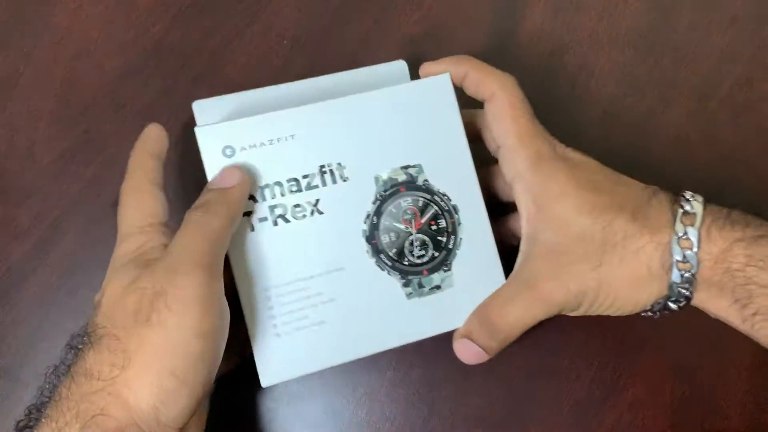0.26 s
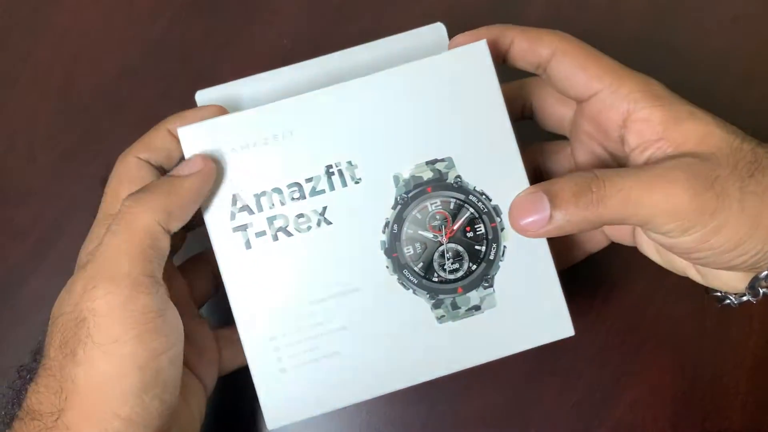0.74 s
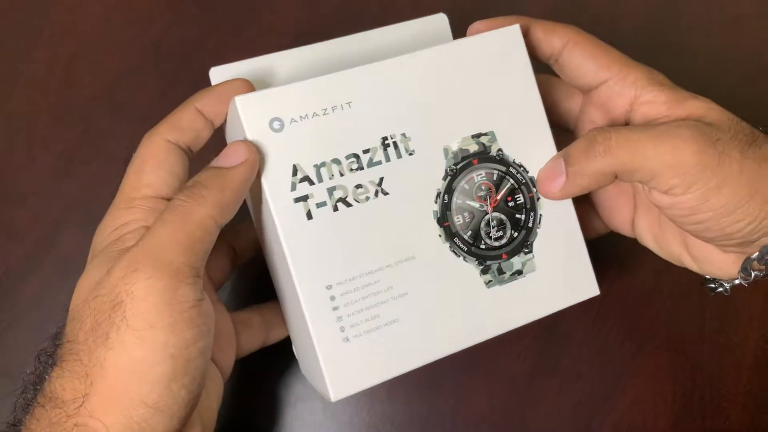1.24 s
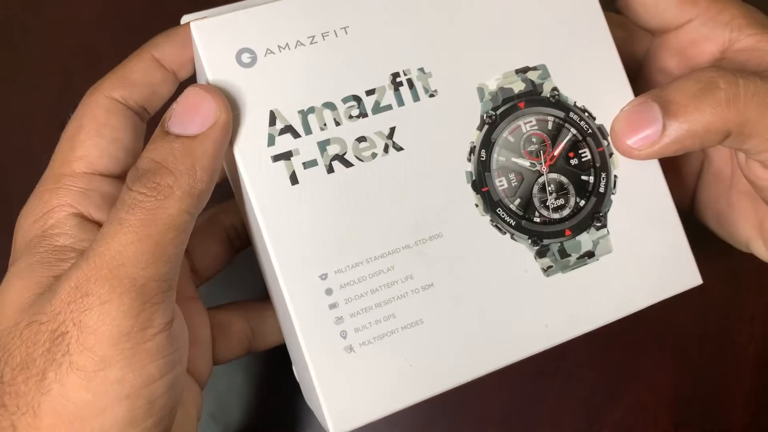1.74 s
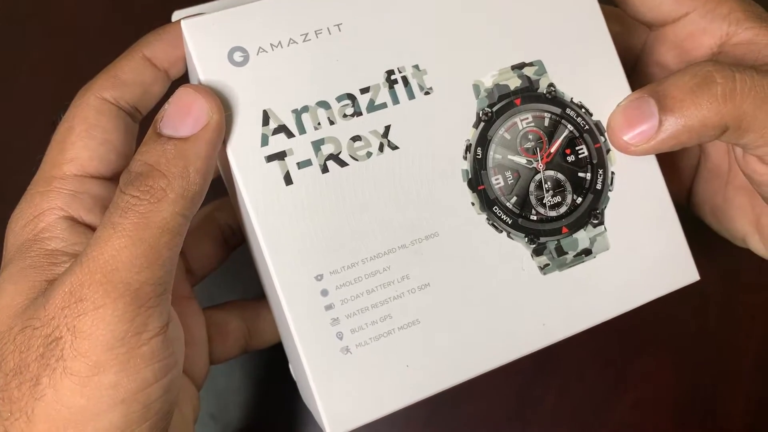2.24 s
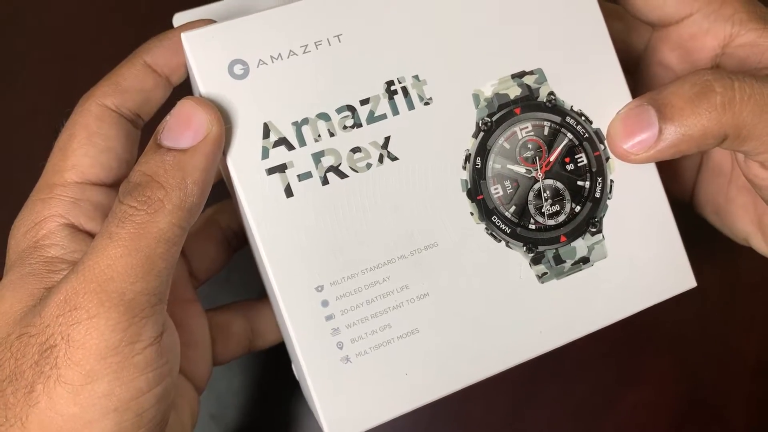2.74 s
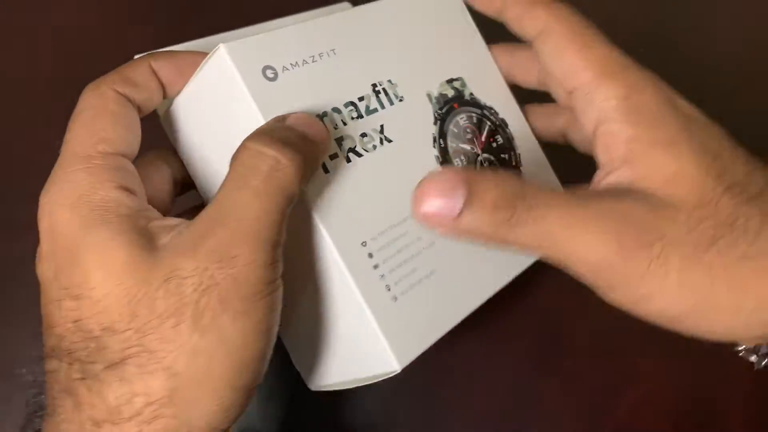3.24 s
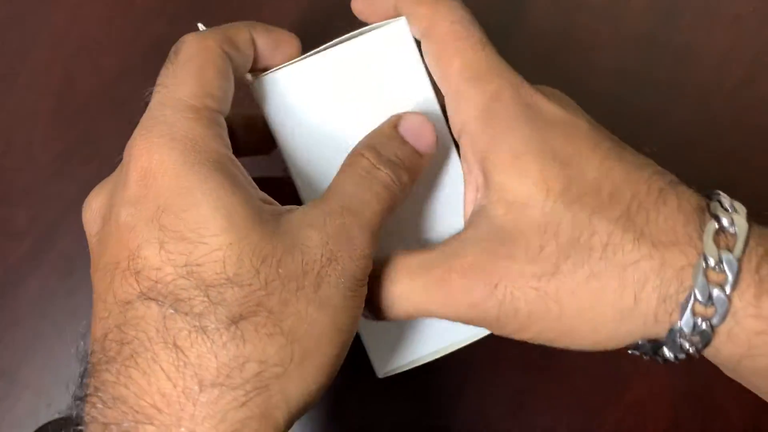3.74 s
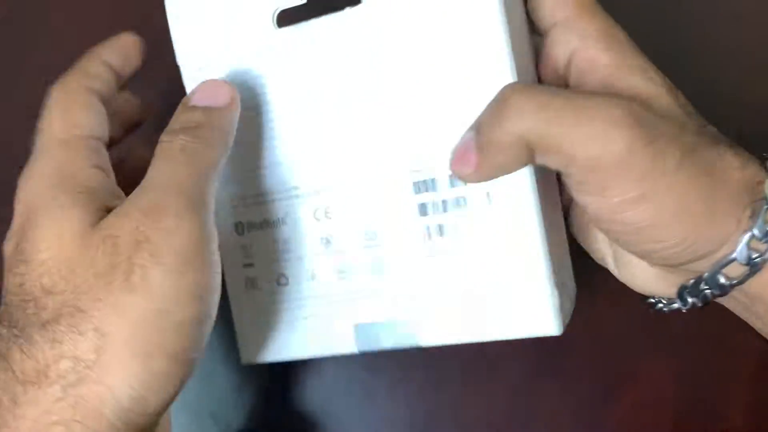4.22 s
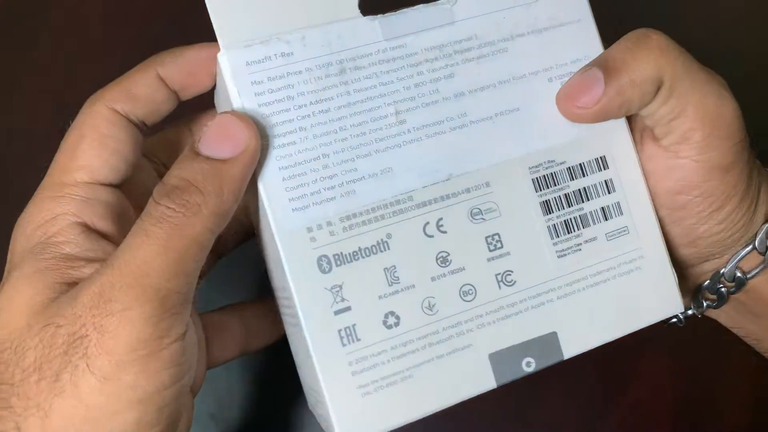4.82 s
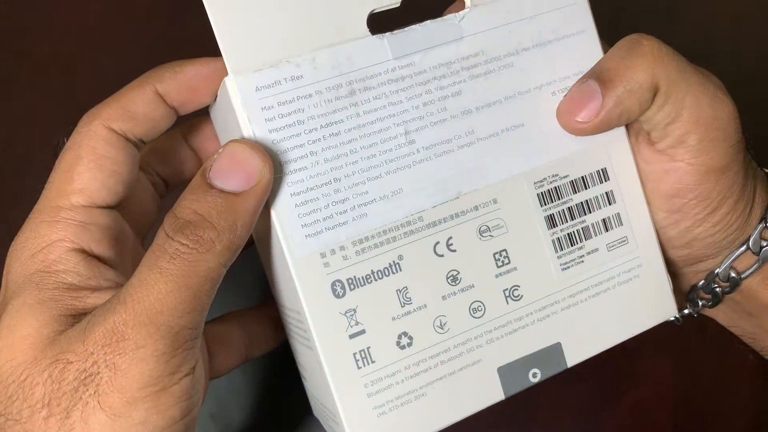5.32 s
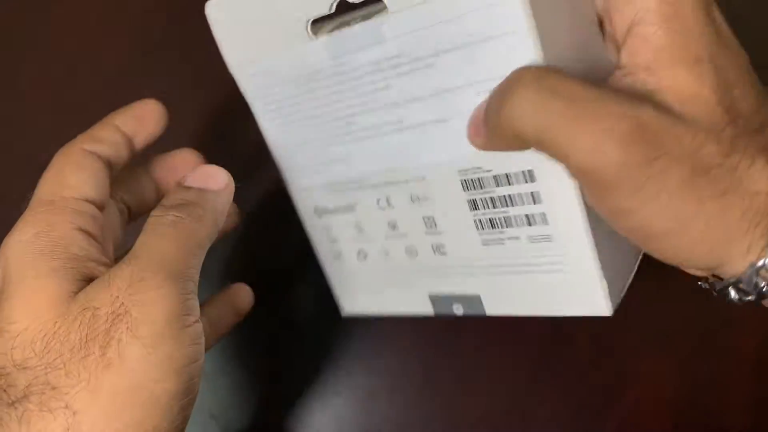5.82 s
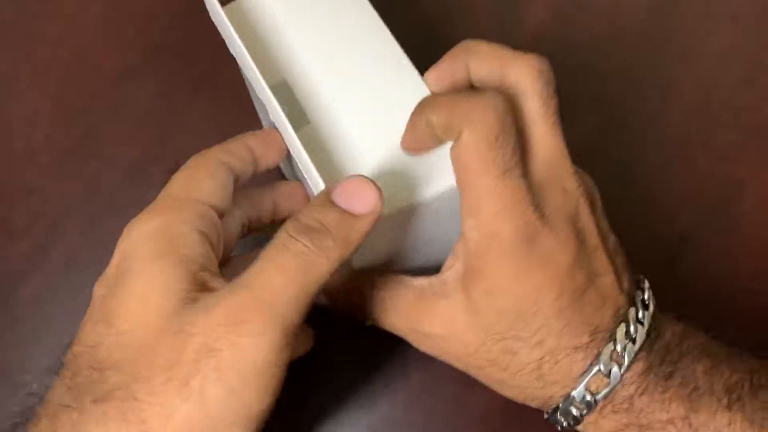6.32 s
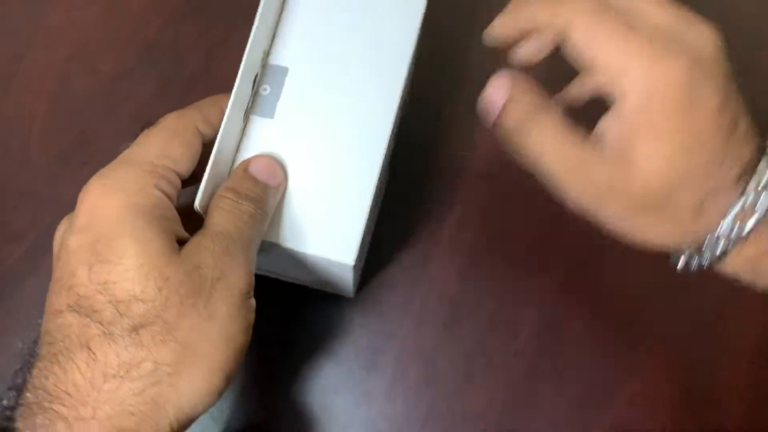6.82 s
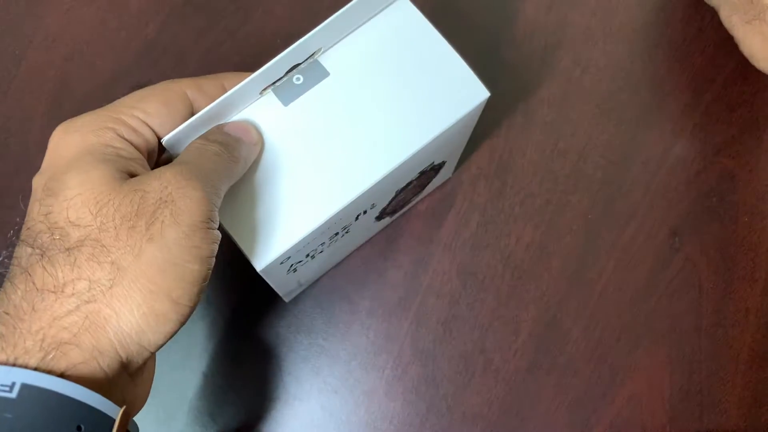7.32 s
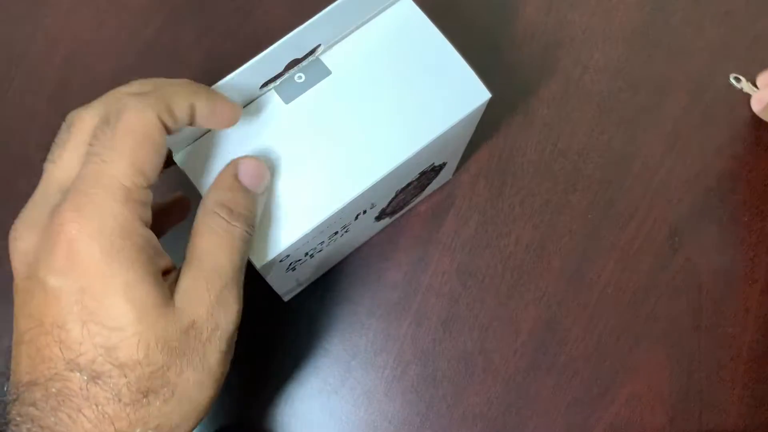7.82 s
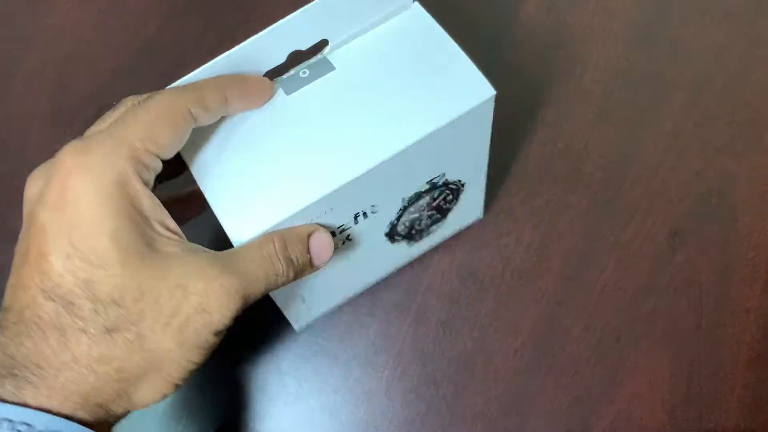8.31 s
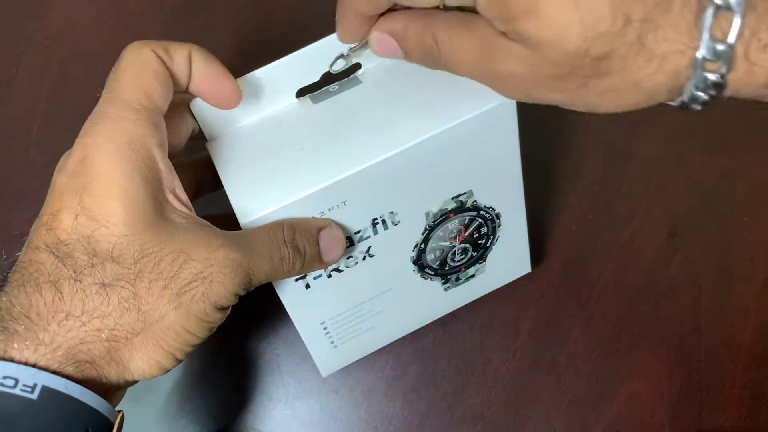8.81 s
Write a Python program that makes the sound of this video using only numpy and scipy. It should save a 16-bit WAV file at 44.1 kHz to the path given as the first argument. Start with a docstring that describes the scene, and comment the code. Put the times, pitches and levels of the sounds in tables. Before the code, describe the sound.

Fingers softly rub and tick on a small cardboard box over a steady fan hum, then it knocks down hard on wood and something scrapes.

```python
"""Hands turn a small cardboard box over a wooden table in a room with a fan hum; a phone listens from above.
Fingers rub the card: noise grains under swelling pressure; fingers and bouncing box tick: short noise bursts.
The box lands in three blows, the last two close together: decaying modes of box and table, and a noise tail.
Two scrapes over the table, as a small metal pin is taken up, add singing bands and ringing snags.
The fan is shaped noise; the left and right channels carry it all slightly unlike."""
import sys
import numpy as np
from scipy import signal
from scipy.fft import rfft, irfft, next_fast_len
from scipy.io import wavfile
from scipy.ndimage import uniform_filter1d

SR = 44100
rng = np.random.default_rng(int(sys.argv[2]) if len(sys.argv) > 2 else 0)


def materialize(psi):
    """Save the field psi as 16-bit PCM at rate SR to the path in sys.argv[1].

    A 1-D psi becomes a single channel; in a 2-D psi each row is a channel.
    """
    bounded = np.clip(np.atleast_2d(psi).T, -1, 1)
    quanta = np.round(bounded * 32767).astype(np.int16)
    wavfile.write(sys.argv[1], SR, quanta)


N = 399546


def amp(db):
    """Gain of a level in dB."""
    return 10 ** (np.asarray(db) / 20)


def evened(x):
    """Scales to rms 1."""
    return x / np.sqrt(np.mean(x ** 2) + 1e-20)


def noise(*shape):
    """White noise of unit variance."""
    return rng.standard_normal(shape)


def read(points, hz):
    """Reads a spectrum table on a log-frequency axis."""
    f, value = np.transpose(points)
    return np.interp(np.log(hz + 1), np.log(f + 1), value)


def add(mix, s, sound):
    """Adds a sound to the mix at a time in seconds."""
    part = mix[:, round(s * SR):][:, :sound.shape[1]]
    part += sound[:, :part.shape[1]]


def colour(x, gain):
    """Filters by a function of frequency."""
    size = next_fast_len(x.shape[-1] + 4096)
    spectrum = rfft(x, size) * gain(np.fft.rfftfreq(size, 1 / SR))
    return irfft(spectrum, size)[..., :x.shape[-1]]


def hump(hz, centre_hz, width):
    """Magnitude of one resonance, top 1."""
    return 1 / np.sqrt(1 + (2 * (hz - centre_hz) / width) ** 2)


def slope(hz, lo_hz, hi_hz):
    """Band with fourth-order skirts."""
    return 1 / np.sqrt((1 + (lo_hz / (hz + 1)) ** 8) * (1 + (hz / hi_hz) ** 8))


# spectrum of the fan wash: f/Hz, relative level/dB
FAN_WASH = [(25, -17.5), (45, -11), (90, 7), (200, -4), (330, -0.5), (480, -3.5), (700, -21), (870, -3),
            (1150, -14), (2200, -25), (4200, -34.5), (5300, -46), (6000, -50), (9000, -72.5), (16000, -57)]
# table and room modes: f/Hz, level after a blow/dB, t60/s, relative level in the hum/dB
TABLE_MODES = [(51.1, -27, 1, -55), (82, -15.5, 0.16, -54), (110.6, -15.5, 1.1, -54),
               (112.4, -16.5, 1.27, -54), (165.9, -12.5, 0.56, -51.5), (263.6, -14.5, 0.33, -62.5),
               (312.6, -17.5, 0.7, -58), (390.6, -5.5, 0.54, -52.5), (446, -12, 0.32, -51),
               (456.5, -28, 0.64, -54), (517, -23.5, 0.66, -61.5), (673, -23, 0.28, -71.5),
               (887, -22, 0.19, -56.5)]
WASH_DB = -43.5  # before the air flow wavers


def hum():
    """Fan noise, which also keeps the modes of table and room sounding, wavers with the air flow."""
    wash = amp(WASH_DB) * evened(colour(noise(2, N), lambda f: amp(read(FAN_WASH, f))))

    def mode_gain(f):
        power = 0
        for hz, _, t60, db in TABLE_MODES:
            power = power + amp(2 * db) / (np.pi * 1.1 / t60) * hump(f, hz, 2.47 + 1.5 / t60) ** 2
        return np.sqrt(power * SR / 2)

    modes = colour(noise(2, N), mode_gain)
    air_flow = evened(colour(noise(N), lambda f: slope(f, .5, 23)))
    return amp(0.7 * air_flow) * (wash + modes)


def swell(rise, fall):
    """Power of one touch: up over rise seconds, down over fall seconds."""
    up = np.arange(0, 1, 1 / (rise * SR))
    down = np.arange(1, 0, -1 / (max(fall, .005) * SR))
    return abs(np.sin(np.pi / 2 * np.r_[up, down])) ** 4.9


# fingers sweep over the card, swelling and fading:
# start t/s, length t/s, scuff level/dB, skin hiss above scuff/dB
FINGER_STROKES = [(0, .15, -59, -10), (0, 1.28, -73.5, -7), (0.065, 0.24, -55, 3.5), (.18, 0.12, -55.5, -5),
                  (0.741, 0.13, -64.5, 5), (2.3, 3.9, -78.5, -6), (3.719, 0.16, -61.5, 12.5),
                  (3.952, 0.22, -66.5, -7), (5.678, 0.14, -67, -3), (5.763, 0.092, -70, 4),
                  (6.187, 0.11, -61.5, 2), (6.37, 0.21, -52, -3), (6.76, 0.49, -64, 4),
                  (8.755, 0.13, -65.5, -2.5)]
# fingers take hold at once and slip to rest: start t/s, length t/s, scuff level/dB, skin hiss above scuff/dB
FINGER_GRABS = [(0.268, 0.13, -64.5, -7), (0.345, 0.18, -69, 2), (0.51, 0.12, -72, -1),
                (0.712, 0.096, -68, 5), (3.1, 0.13, -66, -21), (3.17, 0.062, -61, 0),
                (3.315, 0.042, -64, -5), (3.423, 0.13, -74, 9.5), (3.629, 0.22, -69, 11),
                (4.265, 0.032, -59.5, 0), (4.625, 0.098, -65, -12), (6.288, 0.18, -51.5, 5),
                (6.504, 0.1, -53.5, -4), (6.548, 0.7, -65.5, -8), (8.587, 0.11, -62.5, -15),
                (8.658, 0.065, -63, -5)]
# two long scrapes over the table, each a run of points:
# t/s, scuff level/dB, skin hiss above scuff/dB, dull body level/dB
TABLE_SCRAPES = [
    [(7.325, -96, 0, -74), (7.35, -49.5, -9, -49.5), (7.392, -56, 0, -49), (7.44, -58, -1, -57),
     (7.602, -57, -2, -48.5), (7.7, -48, -4.5, -44.5), (7.775, -56, 10.5, -43.5),
     (7.858, -57.5, 9.5, -41.5), (8.0, -68, -1, -54.5)],
    [(8.0, -73, -1, -55), (8.1, -60.5, 4.5, -63), (8.13, -70, 3, -55), (8.2, -65.5, 14, -55),
     (8.274, -66, -5, -54), (8.344, -53, 6, -50.5), (8.42, -59, 13.5, -51.5), (8.485, -68.5, 9, -57),
     (8.51, -56, 0, -52.5), (8.59, -82, -8, -61)],
]
STROKE_RISE, GRAB_RISE_S = 0.42, 0.016  # share of a stroke spent swelling; seconds
BODY_DB = -1  # card body against scuff, in strokes and grabs


def pressure():
    """Power over time of scuff, card body and skin hiss, set by how hard the hands bear on the card."""
    power = np.zeros((3, N))
    touches = [(row, STROKE_RISE * row[1]) for row in FINGER_STROKES]
    touches += [(row, GRAB_RISE_S) for row in FINGER_GRABS]
    for (s, length, db, skin_db), rise in touches:
        levels = amp([[db], [db + BODY_DB], [db + skin_db]])
        add(power, s, levels ** 2 * swell(rise, length - rise))
    for rows in TABLE_SCRAPES:
        s, db, skin_db, body_db = np.transpose(rows)
        t = np.arange(s[0], s[-1], 1 / SR)
        levels = amp([np.interp(t, s, level) for level in (db, body_db, db + skin_db)])
        add(power, s[0], levels ** 2)
    return power


# resonances of the card body: f/Hz, width f/Hz, relative level/dB
CARD_BODY = [(816, 76, 11.5), (1160, 72, 3.5), (1706, 34, 0), (2040, 140, 2), (3240, 250, -1.5),
             (3850, 350, 5)]


def rubbing():
    """Fibres catch and let go: dense uneven grains, heard as card body, scuff and skin hiss."""
    grip = evened(uniform_filter1d(noise(N), size=300))  # the grip stutters every few ms
    grains = noise(2, N) * amp(1.4 * grip + 0.68 * rng.exponential(1, N))
    z = signal.stft(grains, SR, nperseg=512)[2]
    # the touched spot of card favours some narrow bands for a while
    patches = uniform_filter1d(noise(*z.shape[1:]), size=2, axis=0)
    patches = evened(uniform_filter1d(patches, size=12, axis=1))
    grains = signal.istft(z * amp(3.5 * patches), SR, nperseg=512)[1][:, :N]

    def body_gain(f):
        resonances = sum(amp(db) * hump(f, hz, width) for hz, width, db in CARD_BODY)
        return slope(f, 490, 3200) * (0.073 + resonances)

    scuff = colour(grains, lambda f: slope(f, 4150, 7400) * (1 + 0.8 * hump(f, 5600, 900)))
    body = colour(grains, body_gain)
    skin = colour(grains, lambda f: slope(f, 9100, 19000) * (1 + .5 * hump(f, 10400, 1600)))
    return sum(np.sqrt(power) * evened(layer) for power, layer in zip(pressure(), (scuff, body, skin)))


ROOM_DB, ROOM_T60 = -10.5, 0.082  # tail energy against the direct sound/dB, t60/s


def room(x):
    """Adds a diffuse noise tail that starts after the first walls answer."""
    t = np.arange(SR // 2) / SR
    tail = noise(len(t)) * amp(-60 * t / ROOM_T60) * (t > .004)
    return x + amp(ROOM_DB) * signal.oaconvolve(x, tail[None] / np.linalg.norm(tail))[:, :N]


# short ticks of fingers on the card and of the bouncing box, levels before room and channels:
# t/s, snap level/dB, centre f/Hz, level of the duller tap/dB
CONTACT_TICKS = [(0.2827, -40, 5920, -55), (1.395, -47, 6100, -64), (3.016, -48, 6100, -47),
                 (3.113, -54, 5700, -40), (3.1282, -58, 5800, -50), (3.168, -43, 6000, -37),
                 (3.325, -47, 6300, -42), (3.339, -52, 6200, -46), (4.277, -62, 6460, -38),
                 (4.561, -54, 11000, -47), (4.643, -54, 6660, -40.5), (4.9704, -52.5, 6300, -50),
                 (5.7927, -52, 10100, -62), (5.8157, -47, 6140, -56), (6.31, -35.5, 6500, -25.5),
                 (6.4595, -17.5, 9900, -42), (6.522, -38, 6540, -31), (7.3845, -30, 7300, -42),
                 (7.3984, -36, 7030, -48), (7.492, -40, 7680, -50), (7.72, -39, 6800, -48)]
TAP_LO_HZ, TAP_HI_HZ, TAP_T60 = 1000, 4540, 0.0043  # t60 in seconds


def tick(db, hz, tap_db):
    """A short contact of finger or box: a quickly dying burst, broad around its centre, over a duller tap."""
    t = np.arange(2000) / SR
    burst = noise(2, len(t)) * amp(-60 * t / 0.017) * (1 - np.exp(-t / 0.00021))
    burst = colour(burst, lambda f: slope(f, 0.49 * hz, 19000) * (0.18 + hump(f, hz, 1900)))
    tap = noise(2, len(t)) * amp(-60 * t / TAP_T60)
    tap = colour(tap, lambda f: slope(f, TAP_LO_HZ, TAP_HI_HZ))
    return amp(db) * burst / np.max(abs(burst[0])) + amp(tap_db) * tap / np.max(abs(tap[0]))


# the box lands and bounces: t/s, blow level/dB, contact time t/s, edge crack level/dB,
# share passed to the table/dB, diffuse tail level/dB, settling time t/s
BOX_KNOCKS = [(6.282, -9.5, 0.0012, -17, 0, -19, .001), (6.4935, -8.5, 0.00047, -19, -0.5, -17, .0017),
              (6.527, -15.5, 0.0035, -29, -13, -10, .001)]
# modes of the box: f/Hz, relative level/dB, t60/s
BOX_MODES = [(362.5, 5.5, 0.039), (480, 10, 0.017), (654, 0.5, 0.024), (930, 2, 0.023), (1340, -13, 0.0196),
             (1780, -20, 0.036), (100.4, -10.5, 0.35)]
# spectrum of the diffuse tail: f/Hz, relative level/dB
ECHO_SPECTRUM = [(60, -13), (120, -1), (400, 6.5), (650, 0), (900, -8.5), (2000, -23), (4000, -32),
                 (9000, -56)]
# decay of the diffuse tail: f/Hz, t60/s
ECHO_DECAY = [(100, 0.99), (400, 0.49), (1000, 0.62)]


def knock(db, contact, crack_db, table_db, echo_db, settle):
    """The edge cracks, then the face lands: a soft push rings the box and the table, and the room answers."""
    t = np.arange(SR) / SR
    bump = np.sin(np.pi * np.arange(0, contact, 1 / SR) / contact) ** 2
    push = np.r_[np.zeros(round(.0025 * SR)), bump]  # the face comes 2.5 ms after the edge

    land = 1 - np.exp(-(t / settle) ** 2)  # the face settles from edge to edge
    rings = [land * amp(g - 60 * t / t60) * np.sin(2 * np.pi * hz * t) for hz, g, t60 in BOX_MODES]
    # each landing spot drives the table modes unevenly
    spot = rng.uniform(-3.5, 1, (len(TABLE_MODES), 2))
    for (hz, g, t60, _), (uneven_db, turn) in zip(TABLE_MODES, spot):
        build = 1 - np.exp(-t * hz / 0.37)  # about one cycle
        decay = amp(g + table_db + uneven_db - 60 * t / t60)
        rings.append(build * decay * np.sin(2 * np.pi * hz * t + 0.19 * turn))
    # neighbour modes differ between left and right
    sides = np.array([np.ones(len(rings)), np.resize([.8, -.8], len(rings))])

    hz, frames, z = signal.stft(noise(2, SR), SR, nperseg=512)
    z = z * amp(read(ECHO_SPECTRUM, hz)[:, None] - 60 * frames / read(ECHO_DECAY, hz)[:, None])
    echo = signal.istft(z, SR, nperseg=512)[1][:, :SR]
    rise = 1 - np.exp(-t / 0.0019)  # the tail takes a few ms to build
    echo = amp(echo_db) * rise * echo / np.sqrt(np.mean(echo[:, :4000] ** 2))

    struck = signal.oaconvolve(sides @ rings + echo, push[None] / push.sum())[:, :SR]
    crack = noise(2, SR) * amp(crack_db - 60 * t / 0.045) * (1 - np.exp(-t / .002))
    crack = colour(crack, lambda f: slope(f, 700, 17600) * (0.11 + hump(f, 1300, 1900)))
    return crack - amp(db) * struck


# narrow bands that sing while scraping: start t/s, length t/s, first f/Hz, last f/Hz, relative level/dB
SCRAPE_SINGS = [(7.335, 0.21, 14150, 14000, -57), (7.504, 0.16, 14100, 15000, -61),
                (7.68, .22, 15200, 14800, -57), (7.532, 0.42, 1748, 2260, -53.5),
                (7.56, 0.25, 3510, 3550, -56), (7.723, 0.074, 3100, 3030, -49),
                (7.728, 0.12, 3840, 3950, -45.5), (7.742, 0.12, 762, 810, -51),
                (8.033, 0.29, 1707, 1690, -53.5), (8.118, 0.13, 2260, 2200, -56),
                (8.156, 0.09, 1162, 1134, -49)]
SING_EDGE_DB, SING_WIDTH_HZ = -7.5, 44  # both ends of a sung band against its middle; bandwidth


def sing(s, length, first_hz, last_hz, db):
    """Rough wood keeps plucking one mode of the scraped thing; the mode drifts with the grip."""
    u = np.arange(0, 1, 1 / (length * SR))
    plucks = noise(2, len(u)) * amp(1.4 * rng.exponential(1, len(u)))
    plucks = plucks * amp(3.0 * evened(uniform_filter1d(noise(len(u)), size=900)))  # in fits and starts
    # a narrow resonance about 0 Hz, then carried up to the drifting pitch
    pole = np.exp(-np.pi * SING_WIDTH_HZ / SR)
    slow = signal.lfilter([1], [1, -pole], plucks[0] + 1j * plucks[1])
    cycles = np.cumsum(first_hz + (last_hz - first_hz) * u) / SR
    ring = (slow * np.exp(2j * np.pi * cycles)).real
    arch = amp(db + SING_EDGE_DB * (2 * u - 1) ** 2)
    return s, np.tile(arch * evened(ring), (2, 1))


# the scraped edge snags and rings briefly: t/s, f/Hz, relative level/dB
SCRAPE_CATCHES = [(7.616, 1770, -40), (7.654, 3600, -39), (7.706, 2100, -35), (7.805, 787, -34),
                  (8.333, 2300, -39)]
CATCH_CYCLES = 55  # cycles to die away by 60 dB


def catch(s, hz, db):
    """A snag lets go and one mode of the scraped thing rings out."""
    cycles = np.arange(SR // 10) * hz / SR
    decay = (1 - np.exp(-cycles / 3.5)) * amp(db - 60 * cycles / CATCH_CYCLES)
    return s, np.tile(2 * decay * np.sin(2 * np.pi * cycles), (2, 1))


# likeness of left and right for sound on unlike paths: f/Hz, likeness (0 to 1)
STEREO_LIKENESS = [(100, .998), (300, .97), (520, .82), (700, .5), (1200, .7), (2300, .52), (3500, .72),
                   (4500, .94)]


def scene():
    """Sources sound along two paths, the same on both for sings and catches; left and right differ by the second."""
    hands = rubbing()
    for s, *row in CONTACT_TICKS:
        add(hands, s, tick(*row))
    for row in SCRAPE_SINGS:
        add(hands, *sing(*row))
    for row in SCRAPE_CATCHES:
        add(hands, *catch(*row))
    paths = hum() + room(hands)
    for s, *row in BOX_KNOCKS:
        add(paths, s, knock(*row))
    same = lambda f: np.clip(read(STEREO_LIKENESS, f), 0, 1)
    shared = colour(paths[0], lambda f: np.sqrt((1 + same(f)) / 2))
    apart = colour(paths[1], lambda f: np.sqrt((1 - same(f)) / 2))
    return np.array([shared + apart, shared - apart])


# level balance of the channels: f/Hz, left minus right/dB
STEREO_LEAN = [(160, 0), (350, 1.5), (500, 1.5), (750, -2), (1200, -.5), (3000, 0)]
# phase between left and right: f/Hz, left ahead of right/rad
STEREO_LEAD = [(0, 0), (400, -.1), (600, -.6), (950, 0), (2000, .6), (3500, 1.3), (4600, 3.14),
               (17500, 22.0)]
BASS_HZ, EDGE_HZ = 45, 15750  # low and high limits of the sound


def record(dry):
    """Left and right differ in level and phase, half on each side; deep bass and top treble are rolled off."""
    def half(f):
        phase = np.interp(f, *np.transpose(STEREO_LEAD))
        return amp(read(STEREO_LEAN, f) / 2) * np.exp(.5j * phase)

    pair = np.array([colour(dry[0], half), colour(dry[1], lambda f: 1 / half(f))])
    pair = signal.sosfilt(signal.butter(3, BASS_HZ, "high", fs=SR, output="sos"), pair)
    band_limit = signal.firwin(511, EDGE_HZ, window=("kaiser", 9), fs=SR)
    return signal.oaconvolve(pair, band_limit[None], "same")


dry = scene()
out = record(dry)
materialize(out)
```